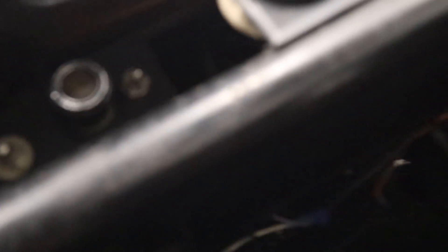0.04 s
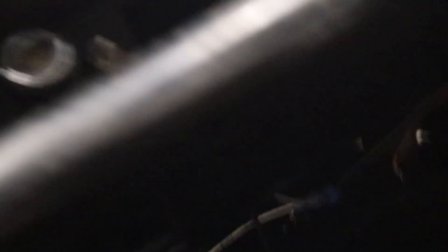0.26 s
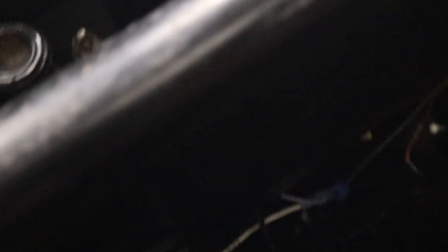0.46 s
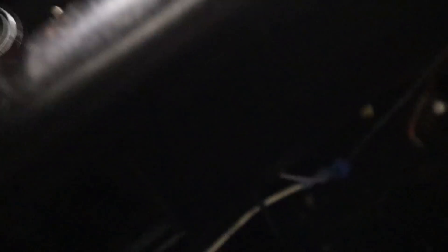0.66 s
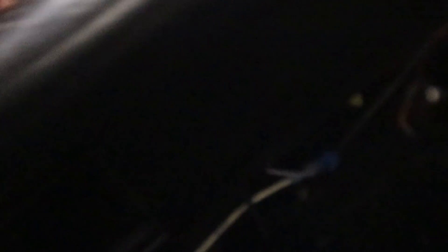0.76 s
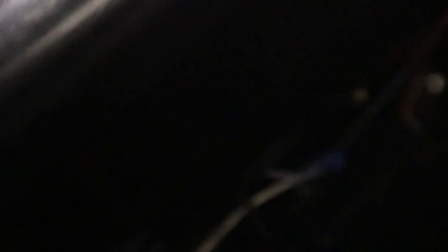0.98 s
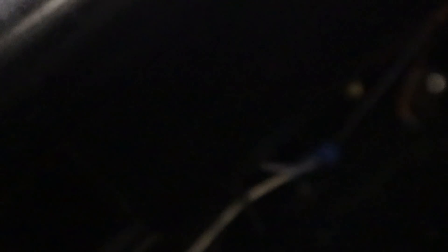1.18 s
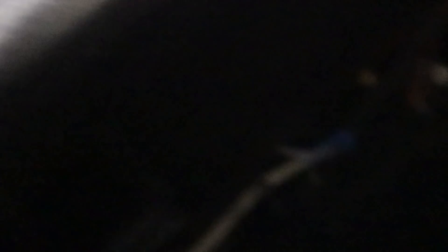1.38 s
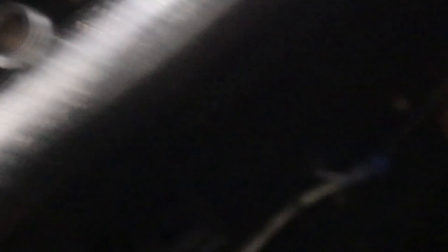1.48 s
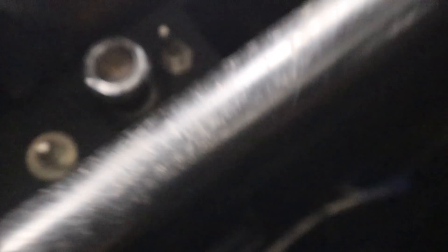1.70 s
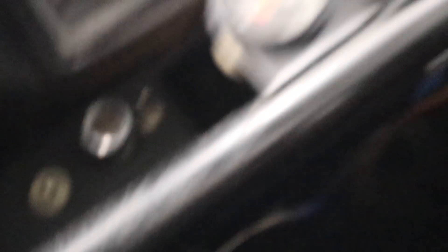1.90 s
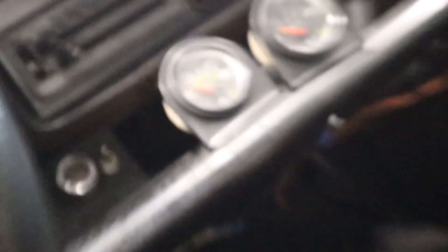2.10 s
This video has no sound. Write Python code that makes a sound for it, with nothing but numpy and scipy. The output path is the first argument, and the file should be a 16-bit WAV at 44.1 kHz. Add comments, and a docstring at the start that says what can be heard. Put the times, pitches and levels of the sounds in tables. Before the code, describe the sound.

Electric motor whirring up to a low steady hum following a hard switch click in a parked car

```python
"""An electric motor behind a panel spins up and hums in a parked car: shaft-order sines over a noise whirr.
A loud switch clack precedes it: noise cracks, a ringing panel and a cabin tail that decays by band.
Before and around these a hand rubs, rustles, knocks and ticks near the microphone: enveloped coloured
noise and decaying sines. Low rumble and still air lie beneath, also coloured noise.
The stereo microphone spreads the treble wide, nearly in opposite phase."""
import sys
import numpy as np
from scipy import signal
from scipy.fft import rfft, irfft, next_fast_len
from scipy.io import wavfile
from scipy.ndimage import uniform_filter1d

SR = 44100
rng = np.random.default_rng(int(sys.argv[2]) if len(sys.argv) > 2 else 0)


def output_pcm(signal):
    """Save a mono or channel-first signal as 16-bit PCM at the path in sys.argv[1].

    Samples are clipped to [-1, 1] before scaling.
    """
    pcm = np.clip(np.atleast_2d(signal).T, -1, 1) * 32767
    wavfile.write(sys.argv[1], SR, np.round(pcm).astype(np.int16))


N = 94726
TIME_S = np.arange(N) / SR


def amp(db):
    """Decibels to amplitude."""
    return 10 ** (np.asarray(db) / 20)


def evened(x):
    """Scales the whole array to rms 1."""
    return x / np.sqrt(np.mean(x ** 2) + 1e-20)


def read(points, hz):
    """Reads a (frequency, value) table, interpolating over log frequency."""
    f, value = np.transpose(points)
    return np.interp(np.log(hz + 1), np.log(f + 1), value)


def curve(rows, column=1):
    """Interpolates a table column over the scene's time."""
    rows = np.array(rows, float)
    return np.interp(TIME_S, rows[:, 0], rows[:, column])


def coloured(x, colour):
    """Shapes the spectrum of each row of x; overall rms 1."""
    hz = np.fft.rfftfreq(x.shape[-1], 1 / SR)
    return evened(irfft(rfft(x) * amp(read(colour, hz)), x.shape[-1]))


def noise(colour, grain_db=0.):
    """Two unrelated strands of coloured noise, roughened by shared grains of about 2 ms."""
    grain = evened(uniform_filter1d(rng.standard_normal(N), size=90))
    return coloured(rng.standard_normal((2, N)) * amp(grain_db * grain), colour)


def decay(t, start_s, level_db, t60_s):
    """Exponential decay from start_s, silent before it."""
    return (t > start_s) * amp(level_db - 60 * abs(t - start_s) / t60_s)


def swell(centre_s, half_s):
    """Gaussian envelope, down to 1/e at half_s either side."""
    return np.exp(-((TIME_S - centre_s) / half_s) ** 2)


def drift(count):
    """Slow random curves, rms about 1: sines at 0.4-6 Hz, weaker as they get faster."""
    t, f = np.arange(0, N, 64) / SR, np.geomspace(.4, 6., num=10)
    weights = f ** -.5 / np.sqrt(.5 * np.sum(1 / f))
    phase = f * t[:, None, None] + rng.random((count, len(f)))
    slow = np.sin(2 * np.pi * phase) @ weights
    return np.repeat(slow.T, 64, axis=1)[:, :N]


def cabin():
    """Low rumble from outside and the still air: two coloured noises."""
    # (time [s], level [dB])
    rumble_level = [(0.0, -48.5), (0.182, -52), (0.59, -55.5), (0.622, -59.5), (0.812, -55.5), (0.846, -58),
                    (0.87, -55), (1.114, -59), (1.13, -58)]
    # spectra: (frequency [Hz], relative level [dB per Hz])
    rumble_colour = [(8.8, -49.5), (15, -13.5), (32, 5.5), (54, 2.5), (113, 5.5), (130, -13.5), (151, -6.5),
                     (183, -19.5), (304, -18), (400, -25), (520, -35), (880, -120)]
    air_colour = [(120, -37), (200, -7.5), (377, -15), (522, -13), (710, -8.5), (984, -15.5), (1490, -16),
                  (1990, -22), (3370, -25), (15100, -49.5)]
    air_db = -70
    return amp(curve(rumble_level)) * noise(rumble_colour) + amp(air_db) * noise(air_colour)


def rubbing():
    """Friction noise that crosses from a soft to a hard spectrum as it gets louder."""
    # (time [s], level before trim [dB])
    rub_level = [(0.225, -76), (0.251, -51.5), (0.305, -51.5), (0.317, -55), (0.343, -43.5), (0.369, -45),
                 (0.381, -66.5), (0.41, -85)]
    # spectra: (frequency [Hz], relative level [dB per Hz])
    soft_colour = [(88, -49), (150, -16.5), (497, -17), (869, -4.5), (1140, -24), (1410, -4.5), (1880, -10),
                   (2150, 2), (2660, -12.5), (3360, -7), (4660, -20), (11800, -22), (15100, -35)]
    hard_colour = [(88, -31), (150, -6.5), (284, 4), (417, -9), (558, -3.5), (689, -25), (853, -0.5),
                   (1010, -9), (1610, -7), (1850, 0.5), (2610, -11), (3360, -2), (6860, -14.5),
                   (7850, -19.5), (10300, -13), (13500, -27), (15100, -49)]
    hard_from_db, hard_span_db, trim_db = -53, 7, 2.0  # thresholds before trim
    first_s, last_s = rub_level[0][0], rub_level[-1][0]
    rub_db = curve([(0, -120), (first_s - .02, -90)] + list(rub_level) + [(last_s + .03, -120)])
    hard = np.clip((rub_db - hard_from_db) / hard_span_db, 0, 1)
    soft_noise = np.sqrt(1 - hard) * noise(soft_colour, grain_db=0.5)
    hard_noise = np.sqrt(hard) * noise(hard_colour, grain_db=3.5)
    return amp(rub_db + trim_db) * (soft_noise + hard_noise)


def rustle():
    """Rustle of cloth: bright grainy noise under a level curve."""
    # two stretches of (time [s], level before trim [dB])
    stretches = [
        [(0.4, -86), (0.448, -73.5), (0.484, -73), (0.532, -86.5), (0.622, -84.5), (0.672, -71), (0.886, -66),
         (1.022, -90.5), (1.044, -79), (1.064, -85.5), (1.078, -79), (1.1, -87.5), (1.11, -73.5)],
        [(1.22, -89), (1.244, -81.5), (1.382, -70.5), (1.394, -78), (1.562, -78.5), (1.624, -71.5), (1.73, -78),
         (1.746, -69.5), (1.808, -76), (1.818, -72), (1.838, -78), (2.084, -76.5), (2.147, -77)],
    ]
    # (frequency [Hz], relative level [dB per Hz])
    rustle_colour = [(1180, -31.5), (2000, 4), (2740, -3.5), (2930, -24), (3320, 3.5), (3620, 1.5),
                     (8730, -2), (11000, -0.5), (15100, -16)]
    trim_db = 3.5
    lead_in = [(0, -100), (stretches[0][0][0] - .02, -100)]
    level_db = curve(lead_in + list(stretches[0]) + list(stretches[1])) + trim_db
    return amp(level_db) * noise(rustle_colour, grain_db=0.9)


def swish():
    """A duller swish: noise in overlapping Gaussian swells."""
    # (centre [s], half length [s], peak level [dB])
    swells = [(0.795, 0.03, -61), (0.84, 0.1, -65)]
    # (frequency [Hz], relative level [dB per Hz])
    swish_colour = [(180, -52), (300, -19), (628, -9.5), (893, -6.5), (1120, -11), (2170, -4), (6000, -23),
                    (7800, -43), (13200, -120)]
    envelope = sum(amp(db) * swell(centre_s, half_s) for centre_s, half_s, db in swells)
    return envelope * noise(swish_colour, grain_db=1.5)


def shuffle():
    """A low shuffle: one Gaussian swell of low noise."""
    # (frequency [Hz], relative level [dB per Hz])
    shuffle_colour = [(240, -50), (400, -10), (496, -17), (711, -1.5), (974, -14), (1500, -11.5),
                      (2500, -46), (3250, -76), (5500, -120)]
    centre_s, half_s, peak_db = 0.17, 0.095, -63.5
    return amp(peak_db) * swell(centre_s, half_s) * noise(shuffle_colour, grain_db=2.0)


def knocks():
    """Soft knocks under the rubbing: decaying sines, alike in both strands."""
    # (time [s], frequency [Hz], peak level [dB], t60 [s])
    soft_knocks = [(.243, 393, -48, 0.022), (.331, 290, -39.5, 0.061), (.345, 537, -45, 0.031),
                   (.356, 881, -42.5, 0.052)]
    return sum(decay(TIME_S, start_s, db, t60_s) * np.sin(2 * np.pi * hz * (TIME_S - start_s))
               for start_s, hz, db, t60_s in soft_knocks)


def ticks():
    """Two small ticks: short decays of noise."""
    # (time [s], level before trim [dB])
    small_ticks = [(0.2088, -53), (1.8165, -43)]
    # (frequency [Hz], relative level [dB per Hz])
    tick_colour = [(880, -40.5), (1500, -6), (3000, -8.5), (3500, -17), (4410, -11), (12000, -17),
                   (15000, -30)]
    t60_s, trim_db = 0.027, -4
    envelope = sum(decay(TIME_S, start_s, db + trim_db, t60_s) for start_s, db in small_ticks)
    return envelope * noise(tick_colour)


def hand():
    """All contact sounds of the hand, summed."""
    return rubbing() + rustle() + swish() + shuffle() + knocks() + ticks()


def clack():
    """Contact strikes and bounces as bright cracks, the panel's ring, and the cabin's tail by band."""
    # contact strikes: (time after the first [s], level [dB])
    strikes = [(0, -8), (.0022, -14.5), (.0055, -18)]
    # panel modes: (frequency [Hz], relative level [dB], t60 [s])
    panel = [(347, -7, .1), (555, 0, .1), (706, -3, .08), (1022, -7, .06), (1125, -8, .06), (1518, -3, .05),
             (1718, -4, .05), (1890, 0, .04), (2336, -2, .04), (2832, -3, .04), (3084, -1, .05),
             (3232, -3, .04), (3437, -6, .04), (4188, -7, .04)]
    # spectrum of cracks and tail: (frequency [Hz], relative level [dB per Hz])
    burst_colour = [(88, -54.5), (150, -26), (295, -19), (442, -13), (558, -4), (1300, -5.5), (1880, 3),
                    (3170, 1), (4750, -6), (11800, -13), (15100, -37.5)]
    # cabin decay: (frequency [Hz], t60 [s])
    cabin_t60 = [(250, 0.54), (660, 0.17), (1740, 0.071), (4590, 0.049), (12100, 0.056)]
    start_s, rise_s, crack_t60_s = 1.1402, 0.0011, 0.01
    ring_db, tail_db = -21.5, -14
    linger_db, linger_t60_s, linger_db_per_khz = -38.5, 0.27, 1.5
    t = np.arange(12000) / SR

    burst = coloured(rng.standard_normal((2, len(t))), burst_colour)
    bright = signal.sosfilt(signal.butter(2, 800, "high", fs=SR, output="sos"), burst)
    crack = bright * sum(decay(t, strike_s, db, crack_t60_s) for strike_s, db in strikes)

    ring = sum(amp(db - 60 * t / t60_s) * np.sin(2 * np.pi * (hz * t + rng.random((2, 1))))
               for hz, db, t60_s in panel)

    tail_noise = coloured(rng.standard_normal((2, len(t))), burst_colour)
    hz, at_s, bands = signal.stft(tail_noise, SR, nperseg=256, noverlap=224)
    hz = hz[:, None]
    fade = amp(tail_db - 60 * at_s / read(cabin_t60, hz))
    linger = amp(linger_db - linger_db_per_khz * hz / 1e3 - 60 * at_s / linger_t60_s)
    tail = signal.istft(bands * (fade + linger), SR, nperseg=256, noverlap=224)[1][:, :len(t)]
    grain = evened(uniform_filter1d(rng.standard_normal(len(t)), size=70))
    tail = tail * amp(1.93 * grain)

    rise = np.sin(np.pi / 2 * np.minimum(t / rise_s, 1)) ** 2
    out, start = np.zeros((2, N)), round(start_s * SR)
    out[:, start:start + len(t)] = rise * (crack + amp(ring_db) * ring + tail)
    return signal.sosfilt(signal.butter(2, 180, "high", fs=SR, output="sos"), out)


def motor():
    """Shaft orders, sines at multiples of the shaft speed, over a noise whirr of fixed spectrum."""
    # (time [s], shaft speed [turns/s], then levels before trim [dB]: low orders, 8th order,
    #  16th order, other upper orders, 4th order)
    motor_track = [(1.17, 24.2, -48, -60, -48, -43, -58), (1.196, 24.2, -54, -45.5, -83, -47.5, -51.5),
                   (1.23, 27.4, -43.5, -36.5, -64, -46.5, -40), (1.258, 27.7, -57, -42, -69, -47.5, -62),
                   (1.272, 27.4, -60, -52, -60, -47, -42.5), (1.31, 28.2, -50, -45, -69, -46.5, -55),
                   (1.336, 28.2, -55, -37.5, -73, -46, -47), (1.362, 28.2, -51, -45, -62, -46.5, -47),
                   (1.444, 28.3, -57.5, -41.5, -50.5, -47.5, -48.5),
                   (1.492, 29, -47, -46.5, -50, -46.5, -53), (1.508, 26.6, -66, -74, -61, -55, -48),
                   (1.526, 28.9, -54, -46.5, -48.5, -46.5, -50), (1.56, 28.8, -52, -38.5, -47.5, -49, -45),
                   (1.606, 29.1, -49.5, -35, -49.5, -47.5, -49),
                   (1.67, 29.4, -46.5, -37.5, -46.5, -47.5, -45),
                   (1.968, 29.3, -47, -41, -48.5, -45, -45.5),
                   (2.12, 29.4, -46.5, -44.5, -53, -44.5, -44.5)]
    # (shaft order, relative level [dB])
    order_levels = [(1, -38.5), (2, -27.5), (3, -18), (4, -7.5), (5, -11), (6, -12.5), (7, -12), (8, 0),
                    (9, -15.5), (10, -18), (11, -14.5), (12, -9.5), (13, -10.5), (14, -13.5), (15, -13),
                    (16, -9), (17, -14), (18, -20), (19, -21.5), (20, -26), (21, -21), (22, -25),
                    (23, -38.5), (24, -23.5), (25, -24), (26, -28), (27, -39.5), (28, -32.5), (29, -27),
                    (30, -32)]
    # orders above those: (frequency [Hz], relative level [dB])
    high_orders = [(530, -30), (900, 3), (1130, -13.5), (1240, -4), (1550, -8), (1670, -11), (1900, -16.5),
                   (2470, -42), (4180, -120)]
    # (frequency [Hz], relative level [dB per Hz])
    whirr_colour = [(30, -23), (70, -21), (200, -2), (500, -11.5), (700, -15), (1100, -22.5), (1700, -26),
                    (3000, -30.5), (6000, -39), (9000, -56)]
    high_db, low_trim_db, upper_trim_db, single_trim_db = -30.5, 12, 8, 3
    waver_db, settle_s, rise_s, whirr_db = 1.4, .3, 0.04, -52
    start_s = motor_track[0][0]

    speed = uniform_filter1d(curve(motor_track), size=3000)
    turns = np.cumsum(speed) / SR
    k, db = np.transpose(order_levels)
    top = np.arange(len(order_levels) + 1, 62)
    scatter_db = 3.2 * rng.standard_normal(len(top))
    db = np.append(db, high_db + read(high_orders, top * speed[-1]) + scatter_db)
    k = np.append(k, top)[:, None]

    low_db = curve(motor_track, column=2) + low_trim_db
    upper_db = curve(motor_track, column=5) + upper_trim_db
    # waver starts threefold and settles
    unsettled = 1 + 2 * np.exp((start_s - TIME_S).clip(None, 0) / settle_s)
    waver = waver_db * unsettled * drift(count=len(k))
    db = db[:, None] + np.where(k < 8, low_db, upper_db) + waver
    # orders 8, 16 and 4 follow their own columns, without waver
    db[[7, 15, 3]] = [curve(motor_track, column=c) + single_trim_db for c in (3, 4, 6)]

    sines = np.sin(2 * np.pi * (k * turns + rng.random(k.shape)))
    hum = (amp(uniform_filter1d(db, size=64)) * sines).sum(0)
    strands = np.array([hum, np.roll(hum, 60)])  # second strand 60 samples late
    whirr = amp(whirr_db) * noise(whirr_colour, grain_db=-1.0)
    on = np.clip((TIME_S - start_s) / rise_s + 1, 0, 1)
    return on * (whirr + strands)


def stereo(strands, wide, lean):
    """Mid is strand one; side is mid a quarter turn early, strand two, and a lean (positive = left)."""
    # (frequency [Hz], share of the side signal that follows the mid)
    tied_share = [(20, .3), (500, 0.81), (2000, 0.96), (12000, 0.18)]
    size = next_fast_len(N + 8192)
    hz = np.fft.rfftfreq(size, 1 / SR)
    mid, other = rfft(strands, size)
    tied = np.clip(read(tied_share, hz), 0, 1)
    side = amp(read(wide, hz)) * ((1j * tied + lean) * mid + np.sqrt(1 - tied ** 2) * other)
    return irfft(np.array([mid + side, mid - side]), size)[:, :N]


def scene():
    """Clack, motor, and hand with cabin, each with its own lean; the clack has its own width, the other two
    share one."""
    # (frequency [Hz], side minus mid before lean [dB])
    wide_clack = [(60, -10.5), (120, -11), (240, -12), (470, -17.5), (940, -3.5), (1870, -3.5), (3710, 5),
                  (7390, 5.5), (14700, 12)]
    wide_rest = [(60, -38.5), (120, -19), (240, -11), (470, -12), (940, 1), (1870, 2.5), (3710, 5.5),
                 (7390, 6.5), (14700, 6)]
    background = stereo(cabin() + hand(), wide_rest, lean=0.25)
    return background + stereo(clack(), wide_clack, lean=.1) + stereo(motor(), wide_rest, lean=-.15)


def record(dry):
    """Clips at full scale, then low-passes at the band limit."""
    edge_hz = 15400
    lowpass = signal.firwin(511, edge_hz, window=("kaiser", 9), fs=SR)
    return signal.oaconvolve(np.clip(dry, -1, 1), lowpass[None], "same")


dry = scene()
out = record(dry)
output_pcm(out)
```